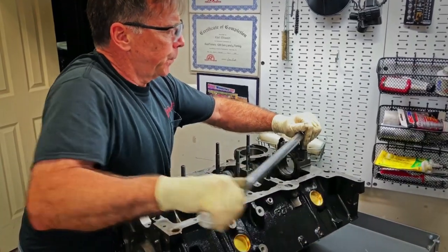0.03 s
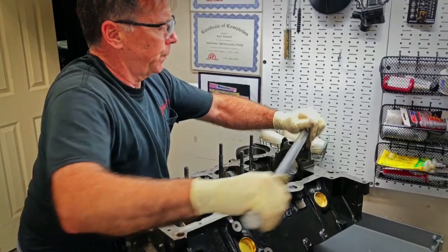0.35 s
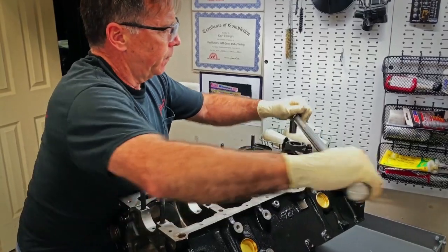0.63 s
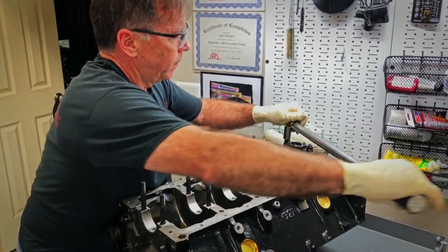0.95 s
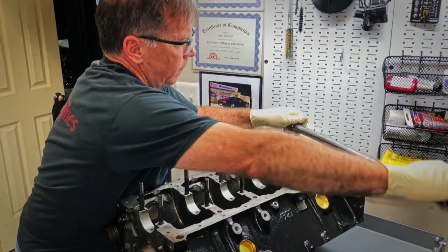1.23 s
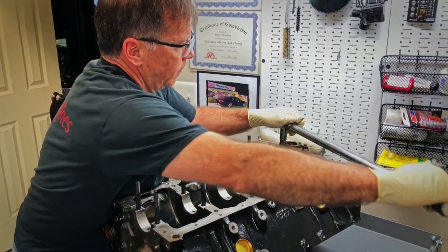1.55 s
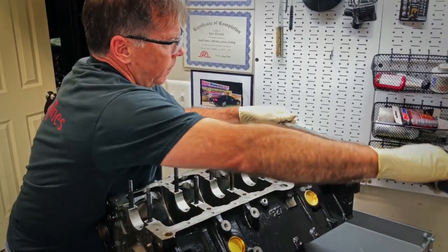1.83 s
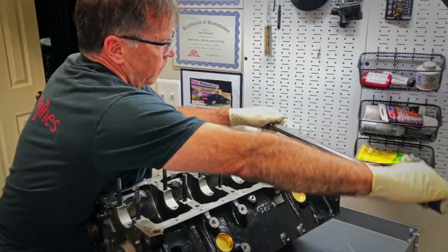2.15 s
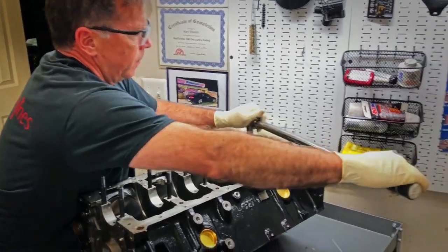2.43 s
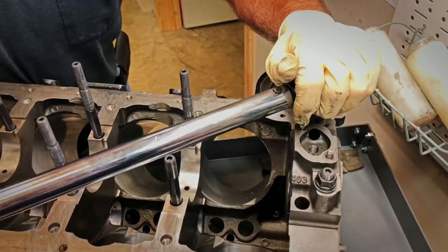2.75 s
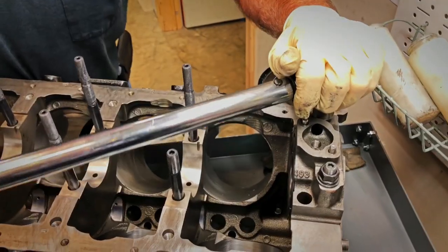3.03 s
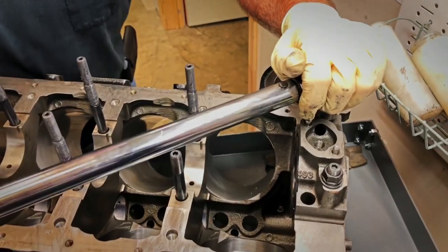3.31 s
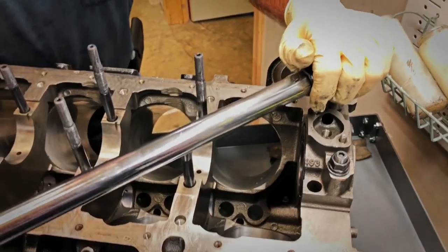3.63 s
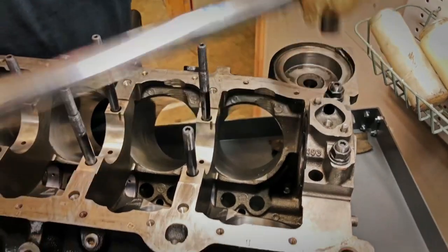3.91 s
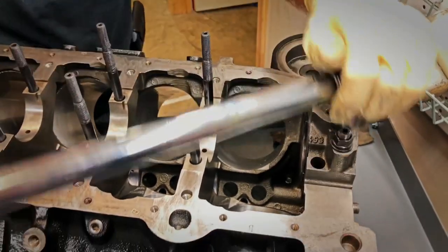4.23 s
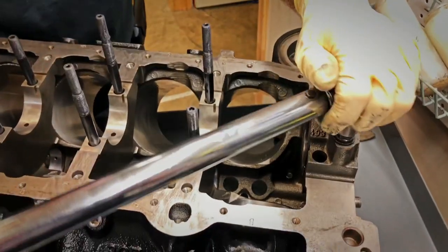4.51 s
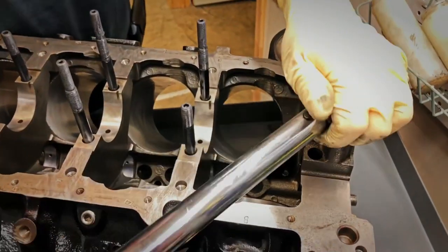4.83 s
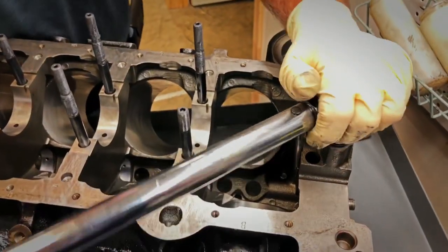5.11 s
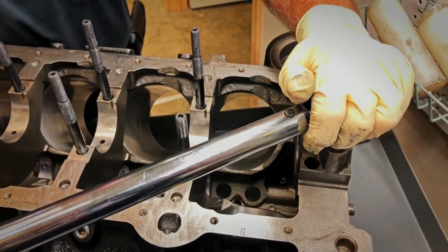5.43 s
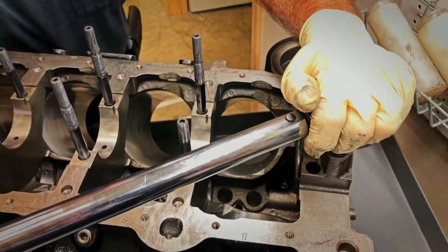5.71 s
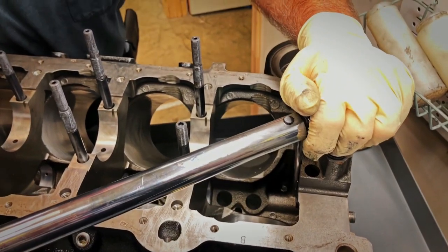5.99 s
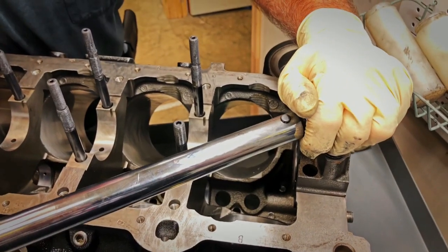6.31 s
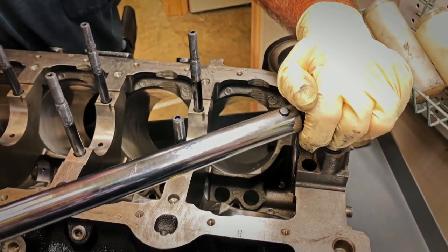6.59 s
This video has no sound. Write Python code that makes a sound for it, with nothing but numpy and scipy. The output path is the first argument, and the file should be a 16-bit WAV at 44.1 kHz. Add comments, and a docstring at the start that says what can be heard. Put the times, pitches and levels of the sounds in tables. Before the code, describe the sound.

A torque wrench snaps over and springs back, two bright metallic clicks heard up close. Short scrapes and ringing clinks come from the socket moving on the nuts, with gloves and sleeves rustling. The wrench clicks twice again and the engine stand rumbles and shakes its tray. The socket clatters and seats with a loud clink, dull knocks follow, and the wrench clicks once more over quiet workshop air.

```python
"""Torque wrench on an engine block

A click-type wrench tightens main-cap nuts in a small workshop. Its pawl ticks under load; the
release snaps over and back, ringing the tube. The socket grinds and clinks on the nuts, and
gloves rub and rustle. The stand knocks and sways and shakes its drip tray, over a soft room hiss."""
import sys
import numpy as np
from scipy import signal
from scipy.fft import rfft, irfft, next_fast_len
from scipy.io import wavfile
from scipy.ndimage import uniform_filter1d

SR = 44100
rng = np.random.default_rng(int(sys.argv[2]) if len(sys.argv) > 2 else 0)


def pcm_store(signal):
    """Save signal as 16-bit PCM."""
    levels = np.round(np.clip(np.atleast_2d(signal), -1, 1) * 32767)
    wavfile.write(sys.argv[1], SR, levels.astype(np.int16).T)


N = 302217

# wrench snaps: t/s, stroke (0 breaks over, 1 springs back), level/dB, lead-in ticks/dB, swell/dB
SNAPS = [(0.019, 0, -20.5, -28, -2), (0.1899, 1, -19, -53, -2), (2.897, 0, -22.5, -28.5, -3.5),
         (3.146, 1, -20.5, -41, -1), (6.7716, 0, -21.5, -32.5, -2.5)]
# wrench moves that rock the stand: t/s, length/s, effort/dB, steel scrape/dB
MOVES = [(0.196, 0.49, -38, -54), (0.75, 0.34, -47, -46.5), (1.103, 0.35, -39, -46.5),
         (1.72, 0.3, -54, -55), (2.124, 0.32, -42, -48), (3.144, 0.27, -34, -49), (3.546, 0.43, -43, -59),
         (4.39, 0.65, -47, -49), (4.936, 0.74, -41, -60)]
# modes of the socket on the block: f/Hz, on its rim/dB, tilted/dB, seating home/dB
SOCKET_MODES = [(660, -52, -60, -58), (1087, -42, -38, -41), (1295, -50, -41, -35), (1502, -58, -53, -42),
                (1868, -52, -45, -34), (2094, -40, -40, -38), (2144, -48, -47, -39), (2196, -58, -44, -37),
                (2523, -54, -41, -38), (2775, -53, -49, -48), (2958, -51, -49, -51), (3105, -45, -58, -57),
                (3266, -51, -45, -42), (3374, -45, -43, -41), (3435, -44, -56, -56), (3706, -47, -53, -44),
                (3806, -48, -42, -40), (4000, -59, -42, -53), (5150, -50, -55, -49), (5780, -55, -48, -41),
                (6560, -51, -56, -48)]
# drip tray resonances: f/Hz, width/Hz, level/dB
TRAY_MODES = [(196.4, 10, 5), (223.5, 6.3, 6), (263.6, 10, 2.5), (312, 9.1, 1)]
# base decay of steel in the room: f/Hz, t60/s
DECAY = [(200, 1), (530, 0.59), (1400, 0.63), (3700, 0.48), (7000, 0.44), (14000, 0.27)]
# bands that set a blow's tone: low/Hz, high/Hz
BANDS = [(250, 900), (900, 2400), (2400, 4800), (4800, 9000), (9000, 16000)]

AGE_S = np.arange(SR) / SR  # time since a blow
DIP_S = 2.511  # the level dips briefly here


def amp(db):
    """Decibels to gain."""
    return 10 ** (np.asarray(db) / 20)


def unit(x):
    """Scale to rms 1."""
    return x / np.sqrt(np.mean(x ** 2) + 1e-20)


def along(points, hz):
    """Interpolate (f/Hz, value) points on a log axis."""
    f, v = np.transpose(points)
    return np.interp(np.log(hz + 1), np.log(f + 1), v)


def wobble(rate_hz, size):
    """Random curve, rate_hz knots a second."""
    at = np.arange(size) * rate_hz / SR
    knots = rng.standard_normal(int(at[-1]) + 2)
    return np.interp(at, np.arange(len(knots)), knots)


def noise(gain, size):
    """Noise of rms 1 shaped by gain(hz)."""
    m = next_fast_len(size)
    shaped = rfft(rng.standard_normal(m)) * gain(np.fft.rfftfreq(m, 1 / SR))
    return unit(irfft(shaped, m)[:size])


def rush(spectrum, size):
    """Noise of rms 1 with an (f/Hz, level/dB) spectrum."""
    return noise(lambda hz: amp(along(spectrum, hz)), size)


def fade(t60_s):
    """Exponential decay after a blow."""
    return amp(-60 * AGE_S / t60_s)


def hump(middle_s, length_s):
    """Gain of a Gaussian swell."""
    return np.exp(-(2 * (np.arange(N) / SR - middle_s) / length_s) ** 2)


def move(start_s, length_s, settle_db_per_s=95, sag_db_per_s=-1, attack_s=0.026):
    """Gain of a move: quick rise, near-level hold, ring-down; earlier moves end at DIP_S."""
    t = np.arange(N) / SR
    age_s = np.maximum(t - start_s, 0)
    fall_db = sag_db_per_s * age_s + settle_db_per_s * np.maximum(age_s - length_s, 0)
    return np.minimum(age_s / attack_s, 1) * amp(-fall_db) * ((t < DIP_S) == (start_s < DIP_S))


def add(track, s, sound):
    """Mix a sound into the track at s seconds."""
    part = track[max(round(s * SR), 0):][:len(sound)]
    part += sound[:len(part)]


def favour(hz, ring_hz, lift_db, octaves):
    """Lift in dB: the contact point excites resonances near ring_hz most."""
    return lift_db * np.exp(-(np.log2((hz + 1) / ring_hz) / octaves) ** 2)


def tilt(hz, centre_hz, usual_hz, slope_db):
    """Tilt in dB: harder contacts have a higher centre and more treble."""
    return slope_db * np.log2(centre_hz / usual_hz) * np.log2((hz + 100) / usual_hz)


def wash(colour, stretch, ripple_db=3.3, step_hz=120):
    """Dense overtones and echoes, colour(hz) in dB; partials vary by blow, treble dies first."""
    ripple = lambda f: ripple_db * wobble(SR / step_hz, len(f)) * f / (f + 4 * step_hz)
    steady = noise(lambda f: amp(colour(f) + ripple(f)), SR)
    hz, t, frames = signal.stft(steady, SR, nperseg=256)
    t60_s = stretch * along(DECAY, hz)[:, None]
    return signal.istft(frames * amp(-60 * t / t60_s), SR, nperseg=256)[1][:SR]


def ring(modes, stretch, scatter_db, blur, damping=0.0195):
    """Steel modes struck at random strengths, blurred by the room; damping shortens high ones."""
    hz, db = np.transpose(modes)
    gains = amp(db + scatter_db * rng.standard_normal(len(hz)))
    gains /= np.sqrt(np.sum(gains ** 2) / 2)
    t60s = stretch * along(DECAY, hz) * (hz / 2500) ** -damping
    out = np.zeros(SR)
    for f, gain, t60_s in zip(hz, gains, t60s):
        phase = 2 * np.pi * (f * AGE_S + rng.random())
        drift = blur * np.sqrt(f / 2500) * wobble(60.4, SR)
        out += gain * fade(t60_s) * np.sin(phase + drift)
    return out


def voiced(blow, band_db, thump_hz=121, cut_db=26):
    """Equalise a blow's first 30 ms toward band_db; steel carries little below thump_hz."""
    head = blow[:round(.03 * SR)]
    power = 2 * abs(rfft(head) / len(head)) ** 2
    hz = np.fft.rfftfreq(len(head), 1 / SR)
    lift = []
    for (lo, hi), db in zip(BANDS, band_db):
        lift_db = db - 10 * np.log10(power[(hz >= lo) & (hz < hi)].sum())
        lift += [(lo * 1.2, lift_db), (hi / 1.25, lift_db)]
    lift = [(thump_hz / 4, lift[0][1] - cut_db), (thump_hz, lift[0][1])] + lift
    cepstrum = irfft(np.log(amp(along(lift, np.fft.rfftfreq(SR, 1 / SR)))))
    cepstrum[1:SR // 2] *= 2  # minimum phase keeps the attack sharp
    cepstrum[SR // 2:] = 0
    return irfft(rfft(blow) * np.exp(rfft(cepstrum)))


def room():
    """Low rumble and soft hiss; sleeves and gloves rustle in swells."""
    # sleeve and glove rustles: middle/s, length/s, level/dB
    rustles = [(0.916, 1, -51), (1.605, .1, -51.5), (1.862, 0.27, -51), (2.416, 0.17, -47.5),
               (3.486, .14, -52), (4.275, 0.36, -53.5), (4.671, 0.27, -46), (5.15, 0.38, -49)]
    # spectra of room air and hiss: f/Hz, level/dB
    air = [(25, -28), (68, -11), (100, -9), (170, -18), (330, -20), (1500, -36.5), (10000, -45)]
    hiss = [(1500, 2.5), (4000, 0), (7000, -1), (10000, -4), (16000, -6.5)]
    rustle = sum(amp(db) * hump(s, length_s) for s, length_s, db in rustles)
    folds = amp(2.2 * wobble(24, N))
    return amp(-50.5) * rush(air, N) + (amp(-67.5) + rustle * folds) * rush(hiss, N)


def ticks():
    """Spring and pawl creep in tiny bright steps, alone or just ahead of a snap."""
    # lone ticks under load: t/s, level/dB, centre/Hz
    lone = [(3.519, -42, 4740), (3.714, -42, 4650), (5.148, -39.5, 6730), (5.563, -35, 2140),
            (6.145, -54, 6330), (6.229, -51.5, 4960), (6.333, -48, 6930)]
    # pawl steps before each snap: ahead/s, level/dB, centre/Hz
    steps = [(.053, -19, 6500), (.030, -20, 3600), (.0222, -1, 6600), (.0125, -6, 4300)]
    spectrum = [(400, -15.5), (2000, -7.5), (6000, -13.0), (15000, -20.5)]  # f/Hz, level/dB
    lead_ins = [(s - ahead_s, lead_db + db, hz) for s, _, _, lead_db, _ in SNAPS
                for ahead_s, db, hz in steps if s > ahead_s]
    out = np.zeros(N)
    for s, db, centre_hz in lone + lead_ins:
        colour = lambda hz: along(spectrum, hz) + tilt(hz, centre_hz, usual_hz=5000, slope_db=8.0)
        tick = noise(lambda hz: amp(colour(hz)), SR) * fade(.015)
        add(out, s, amp(db) * (amp(7.5) * tick + amp(2.0) * wash(colour, stretch=0.26)))
    return out


def snaps():
    """The release cracks and rings the tube; the ring dips briefly, then swells."""
    # wrench tube modes: f/Hz, breaking over/dB, springing back/dB
    tube_modes = [(420, -6, -12), (1066, -10, -10), (1324, -12, -13), (1663, 0, -10), (1873, -5, -11),
                  (2143, -4, -10), (2331, -24, -8), (2449, -11, -7), (2772, -5, -10), (2955, -10, -10),
                  (3305, -25, -14), (3801, -8, -17), (4258, -2, -19), (4500, -8, -15), (4592, -11, -11),
                  (5082, -10, -31), (5400, -24, -14), (5776, -7, -16), (6363, -8, -15), (6928, -18, -13),
                  (7330, -14, -17), (8301, -16, -26), (9749, -26, -18), (11251, -17, -23)]
    # spectra of the crack and of each stroke's dense overtones: f/Hz, level/dB
    crack_spectrum = [(300, -37), (1500, -3), (3200, 18.5), (15000, -4.5)]
    break_wash = [(90, -13), (190, -1.5), (450, -2), (780, -11), (1060, -7), (2200, -4), (3300, -8),
                  (4250, 1), (4900, -15.5), (6100, -7), (8500, -15.5), (10400, -28.5), (11500, -20.5),
                  (16000, -26.5)]
    return_wash = [(110, -42), (200, -12), (330, -7), (740, -14.5), (1080, -9.5), (2000, -6), (2450, -10),
                   (3300, -2.5), (3950, -19), (6400, -10.5), (8700, -26), (9800, -22), (10500, -27),
                   (16000, -32.5)]
    # crack by stroke: level/dB, t60/s
    cracks = [(11.7, 0.017), (10.6, 0.038)]
    # tone by stroke: level/dB in each of BANDS
    tone_db = [(-10, -2.5, 0.55, 1, 0.5), (-15, -5, 0.7, -1.2, -6)]
    dip_s, dip_share = .012, .55  # length of the dip; share of the ring heard during it
    swell_at_s, swell_width_s = 0.029, 0.023
    dip = 1 - (1 - dip_share) * np.exp(-(AGE_S / dip_s) ** 4)
    swell = np.exp(-((AGE_S - swell_at_s) / swell_width_s) ** 2)
    out = np.zeros(N)
    for s, stroke, db, _, swell_db in SNAPS:
        modes = [(hz, levels[stroke]) for hz, *levels in tube_modes]
        crack_db, crack_t60_s = cracks[stroke]
        crack = amp(crack_db) * rush(crack_spectrum, SR) * fade(crack_t60_s)
        body = wash(lambda hz: along([break_wash, return_wash][stroke], hz), stretch=1.365)
        body += amp(-1.5) * ring(modes, stretch=1.0, scatter_db=1.5, blur=.5)
        body *= dip + amp(swell_db) * swell
        add(out, s, voiced(crack + body, db + np.array(tone_db[stroke])))
    return out


def resonant(modes):
    """Random shaking through narrow resonances, each partly levelled."""
    total = np.zeros(N)
    for f, width_hz, db in modes:
        band = noise(lambda hz: 1 / (1 + ((hz - f) / width_hz) ** 2) ** 2, N)
        power = abs(uniform_filter1d(band ** 2, size=2500))
        total += amp(db) * band / np.sqrt(power + 0.24)
    return unit(total)


def stand(judder):
    """The heavy block follows each move late and sways on; moves and snaps shake the drip tray."""
    # resonances of the block on its stand: f/Hz, width/Hz, level/dB
    sway_modes = [(64.7, 11, -17), (73.6, 7.4, 6)]
    lag_s, sway_db, tray_db, kick_db = 0.05, -7.5, -7.5, -54
    sway, tray = np.zeros((2, N))
    for s, length_s, effort_db, _ in MOVES:
        sway += amp(effort_db + sway_db) * move(s + lag_s, length_s, settle_db_per_s=58)
        tray += amp(effort_db + tray_db) * move(s, length_s)
    for s, _, db, _, _ in SNAPS:
        add(tray, s, amp(db + kick_db) * fade(t60_s=0.22))
    return sway * resonant(sway_modes) + tray * judder * resonant(TRAY_MODES)


def handling(judder):
    """Gloves and steel slide unevenly over the block in each move; at times a glove scuffs."""
    # glove scuffs on the handle: middle/s, length/s, level/dB
    scuffs = [(0.455, 0.25, -37.5), (3.664, 0.14, -38), (3.831, 0.06, -36.5)]
    # spectra of rubbing gloves, sliding steel and scuffs: f/Hz, level/dB
    rub_spectrum = [(65, -35), (110, -13), (300, -5), (560, -16), (1100, -20.5), (2000, -100.5)]
    steel_spectrum = [(470, -33), (800, -10), (1080, 3), (4250, -1.5), (6510, -11.5), (11700, -59)]
    scuff_spectrum = [(120, -27), (300, 1.5), (660, 3), (830, -12), (1800, -7.5), (5000, -69)]
    rub, steel = np.zeros((2, N))
    for s, length_s, effort_db, scrape_db in MOVES:
        gain = move(s, length_s)
        rub += amp(effort_db - 2.5) * gain
        steel += amp(scrape_db) * gain
    scuff = sum(amp(db) * hump(s, length_s) for s, length_s, db in scuffs)
    grip, drag = amp(1.8 * wobble(40, N)), amp(1.8 * wobble(110, N))
    return (rub * unit(rush(rub_spectrum, N) * grip * judder)
            + steel * unit(rush(steel_spectrum, N) * drag)
            + scuff * unit(rush(scuff_spectrum, N) * drag))


def grinds():
    """Rough steel faces catch and slip hundreds of times a second; each catch rings the block."""
    # socket sliding on a nut: t/s, length/s, level/dB, treble edge/Hz, favoured f/Hz, growth/dB
    strokes = [(0.507, .06, -36.5, 2770, 2280, -5), (0.686, 0.06, -32.5, 2900, 2490, -16.5),
               (0.937, 0.036, -30, 4100, 3440, 8), (1.317, 0.022, -33, 2970, 1860, -9),
               (3.599, 0.18, -37.5, 4000, 1910, -28), (3.762, 0.027, -33, 3470, 1300, -3),
               (4.435, 0.027, -27, 3620, 2860, -10.5), (4.729, 0.0204, -28.5, 2600, 1330, 12.5)]
    # grinding spectrum: f/Hz, level/dB
    spectrum = [(150, -27), (500, -9.5), (800, -17), (1100, 4), (2600, -1.5), (16000, -2.5)]
    catches_per_s, edge_drop_db = 700, 30.5
    out = np.zeros(N)
    for s, length_s, db, edge_hz, ring_hz, growth_db in strokes:
        rolloff = lambda hz: edge_drop_db * (1 - 1 / (1 + (hz / (1.64 * edge_hz)) ** 6))
        contact = lambda hz: favour(hz, ring_hz, lift_db=5, octaves=0.16)
        colour = lambda hz: along(spectrum, hz) - rolloff(hz) + contact(hz)
        sliding = AGE_S < length_s
        catches = (rng.random(SR) < catches_per_s / SR) * rng.standard_normal(SR) * sliding
        catches *= amp(growth_db * np.minimum(AGE_S / length_s, 1))
        catches[0] = 2  # firm first catch
        response = wash(colour, stretch=0.69) * (1 + 3.1 * fade(0.043))
        sound = signal.fftconvolve(catches, response)[:SR]
        add(out, s, amp(db) * sound / np.std(sound[sliding]))
    return out


def clink_bands(db, hardness_db_per_oct, crack_db, ring_hz):
    """Band levels of a contact: hard is bright, soft thuds; the crack sets the top band."""
    # average contact: level/dB in each of BANDS
    tone_db = [-11.5, -1.1, 0.87, -4, -15.5]
    centres_hz = np.sqrt(np.prod(BANDS, axis=1))
    lean_db = np.append(hardness_db_per_oct * np.log2(centres_hz[:-1] / centres_hz[2]), crack_db)
    return db + np.array(tone_db) + lean_db + favour(centres_hz, ring_hz, lift_db=7.5, octaves=0.57)


def clinks():
    """The socket strikes a nut, chatters and rings; its seating decides which modes speak."""
    # socket contacts: t/s, seat (0 rim, 1 tilted, 2 home), level/dB, hardness/(dB/octave),
    # crack/dB, favoured f/Hz, its lift/dB, after-ring/dB, ring length factor
    contacts = [(0.774, 0, -31, 3.5, -7, 4970, 13, -3.5, 1.34),
                (0.9691, 0, -30.5, 5.5, 3.5, 3920, -14.5, 5, 1.2),
                (0.994, 0, -29, 3, -4, 1120, 0.5, -1, 1.77), (1.361, 0, -30, -0.5, -5, 2130, 4, -2, 1.3),
                (2.1427, 0, -32, -3.5, 4, 3280, 13.5, 0, 1.37),
                (3.59, 0, -36.5, 0.5, -2.5, 3170, 7, -17, 1.1),
                (3.724, 2, -38.5, 1.5, -22, 1500, 10, -6, 0.92),
                (4.3437, 1, -29, 3.5, 3, 2130, 4.5, -13, 1.8), (4.404, 1, -40.5, 0.5, 0, 3950, 10, -3, 1.1),
                (4.464, 1, -26.5, 3.5, -6.5, 2260, 4, 5.5, 1.15),
                (4.5582, 1, -39.5, -3, 12.5, 2900, -4, -13.5, 0.65),
                (4.7501, 2, -21, 3.5, 9.5, 1750, 3, 8, 0.8)]
    # dense socket overtones: f/Hz, level/dB
    socket_wash = [(150, -33), (250, -1), (780, -15.5), (1100, -0.5), (1900, -6.5), (2150, -2.5),
                   (2670, -12.5), (3340, -4), (16000, -33)]
    chatter_spectrum = [(300, -7.5), (1500, 9.0), (4000, 7.0), (15000, -12.0)]  # f/Hz, level/dB
    attack = 1 - np.exp(-AGE_S / 0.0004)
    out = np.zeros(N)
    for s, seat, db, hardness, crack_db, ring_hz, lift_db, after_db, life in contacts:
        contact = lambda hz: favour(hz, ring_hz, lift_db, octaves=0.076)
        spike = amp(6) * rng.standard_normal(SR) * fade(0.03)
        chatter = amp(7.5) * rush(chatter_spectrum, SR) * fade(0.078 * life)
        modes = [(hz, levels[seat] + contact(hz)) for hz, *levels in SOCKET_MODES]
        body = amp(-9) * wash(lambda hz: along(socket_wash, hz) + contact(hz), stretch=life)
        body += ring(modes, stretch=0.55 * life, scatter_db=2.5, blur=.25, damping=0.38)
        grip = amp(after_db) + 1.3 * fade(0.9 * life)  # the glove damps the first, strongest ringing
        blow = (spike + chatter + grip * body) * attack
        add(out, s, voiced(blow, clink_bands(db, hardness, crack_db, ring_hz)))
    return out


def scrapes():
    """The handle shifts in the grip with a short, grainy rasp."""
    # handle shifts: middle/s, length/s, level/dB, centre/Hz
    shifts = [(1.735, 0.043, -48, 2400), (3.454, 0.043, -49, 4000), (4.007, 0.033, -49.5, 1250),
              (4.114, 0.033, -52, 3600), (4.718, 0.018, -43, 2400), (5.26, .035, -44, 3000)]
    rasp = lambda centre_hz: noise(lambda hz: amp(favour(hz, centre_hz, lift_db=31.5, octaves=0.85)), N)
    grain = unit(amp(3 * wobble(200, N)))
    return grain * sum(amp(db) * hump(s, length_s) * rasp(hz) for s, length_s, db, hz in shifts)


def knocks():
    """Slack joints slip with dull blows that ring the block briefly."""
    # slips of the loaded stand and tool: t/s, level/dB, centre/Hz, favoured f/Hz
    slips = [(1.847, -42, 1280, 1060), (2.337, -36, 1910, 2260), (3.811, -37.5, 1780, 1270),
             (4.89, -36.5, 2080, 2910), (4.973, -33, 2220, 1950), (5.094, -44, 1720, 1420),
             (5.182, -41, 1500, 1116), (5.233, -44, 1630, 1087), (5.322, -44.5, 1590, 1860),
             (5.432, -31.5, 2030, 1910), (5.517, -34.5, 1840, 1910), (5.611, -37.5, 1650, 1880)]
    # dense stand overtones: f/Hz, level/dB
    stand_wash = [(60, -17), (250, -5), (790, -11.5), (1490, -5), (3150, -10.5), (4300, -23.5),
                  (15600, -54)]
    envelope = (1 + 1.1 * fade(.09)) * (1 - np.exp(-AGE_S / .0014))
    out = np.zeros(N)
    for s, db, centre_hz, ring_hz in slips:
        colour = lambda hz: (along(stand_wash, hz) + tilt(hz, centre_hz, usual_hz=1900, slope_db=4.5)
                             + favour(hz, ring_hz, lift_db=12, octaves=0.045))
        modes = [(hz, tilted_db + colour(hz)) for hz, _, tilted_db, _ in SOCKET_MODES]
        body = wash(colour, stretch=0.66)
        body += amp(-8.5) * ring(modes, stretch=0.62, scatter_db=4.0, blur=0.8)
        add(out, s, amp(db) * body * envelope)
    return out


def lurches():
    """Each lurch of the stand shakes the tray into a short groan with its own mix of modes."""
    # tray shudders: middle/s, length/s, level/dB, favoured f/Hz
    shudders = [(3.208, 0.091, -28.5, 303), (3.31, 0.092, -29.5, 222), (3.4, 0.2, -28.5, 196),
                (3.67, 0.19, -28, 214), (3.847, 0.15, -31, 209), (3.958, 0.24, -36.5, 224),
                (4.997, 0.3, -37, 217), (5.069, 0.16, -31.5, 209), (5.311, 0.23, -34.5, 200),
                (5.489, 0.12, -33.5, 207), (5.597, 0.18, -38.5, 217)]
    out = np.zeros(N)
    for s, length_s, db, ring_hz in shudders:
        groan = np.zeros(SR)
        for hz, _, mode_db in TRAY_MODES:
            gain = amp(mode_db + favour(hz, ring_hz, lift_db=11.5, octaves=0.17))
            groan += gain * np.sin(2 * np.pi * (hz * AGE_S + rng.random()) + 0.5 * wobble(44.03, SR))
        add(out, s - .5, amp(db) * unit(groan) * hump(0.501, length_s)[:SR])
    return out


def scene():
    """Mono mix; tray and gloves share one uneven judder."""
    judder = unit(amp(2.5 * wobble(20, N)))
    contacts = snaps() + clinks() + knocks() + grinds() + scrapes() + ticks()
    return (contacts + stand(judder) + lurches() + handling(judder) + room())[None]


def record(dry):
    """Brief level dip at DIP_S, rounded peaks, lowest bass and top treble cut."""
    low_cut_hz, top_hz = 32, 16000
    dip = np.interp(np.arange(N) / SR - DIP_S, [-.03, 0, .007, .024], [1, .1, .1, 1])
    dipped = dry * dip
    rounded = dipped / (1 + np.abs(dipped) ** 6) ** (1 / 6)
    m = next_fast_len(N + SR // 2)
    hz = np.fft.rfftfreq(m, 1 / SR)
    passband = (hz < top_hz) * hz ** 4 / (hz ** 4 + low_cut_hz ** 4)
    return irfft(rfft(rounded, m) * passband, m)[..., :N]


dry = scene()
out = record(dry)
pcm_store(out)
```